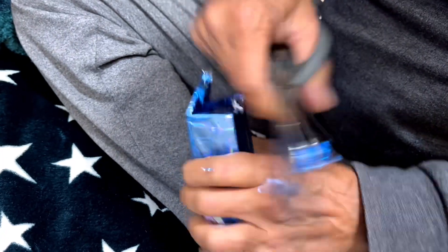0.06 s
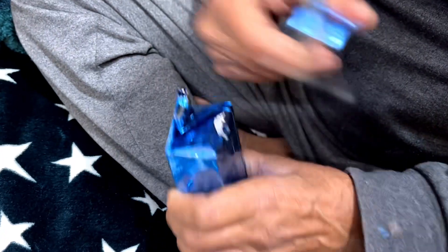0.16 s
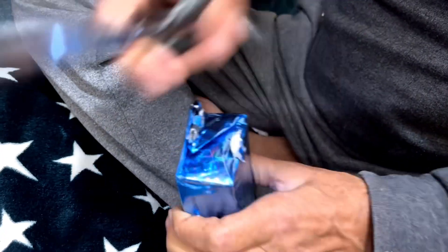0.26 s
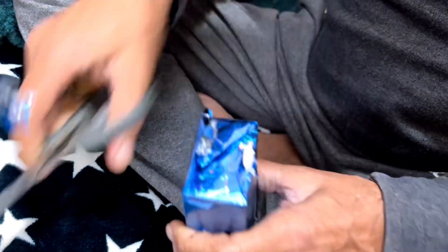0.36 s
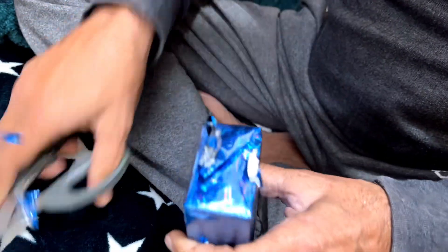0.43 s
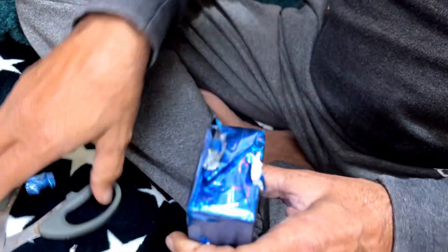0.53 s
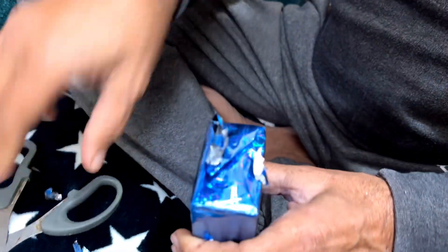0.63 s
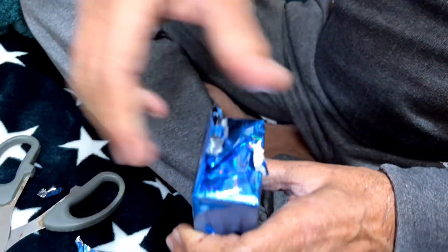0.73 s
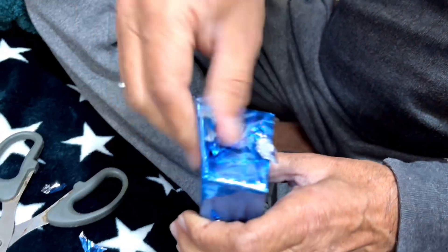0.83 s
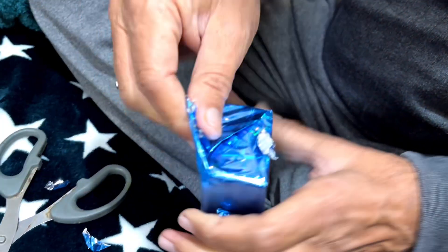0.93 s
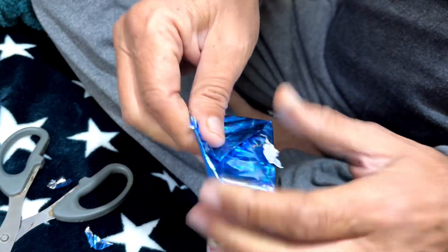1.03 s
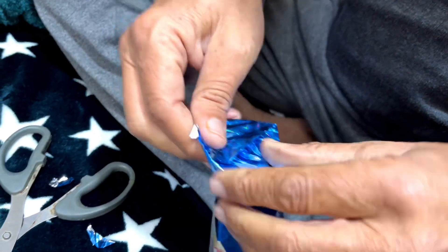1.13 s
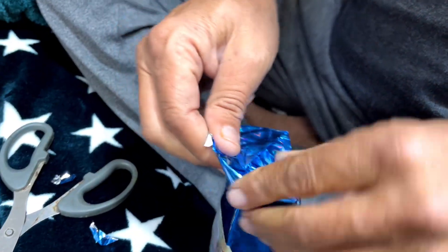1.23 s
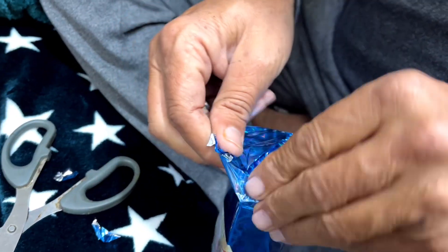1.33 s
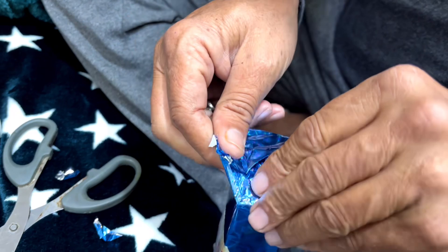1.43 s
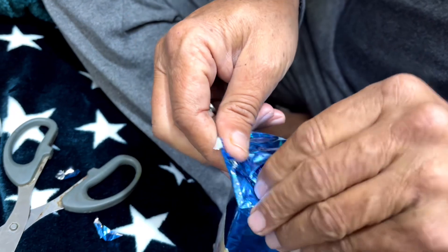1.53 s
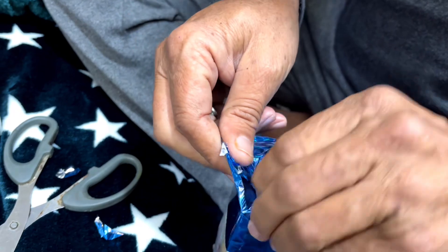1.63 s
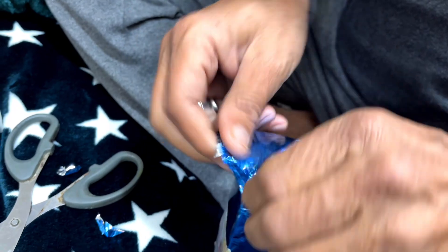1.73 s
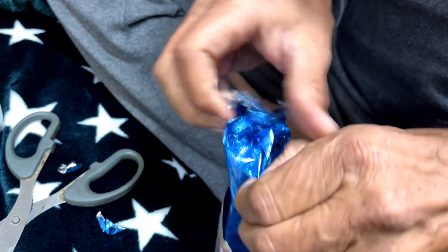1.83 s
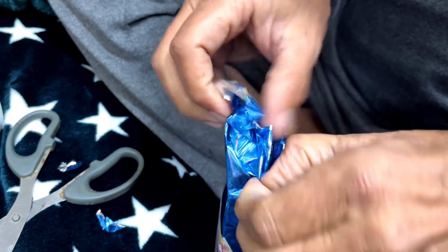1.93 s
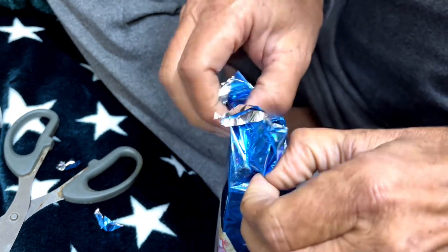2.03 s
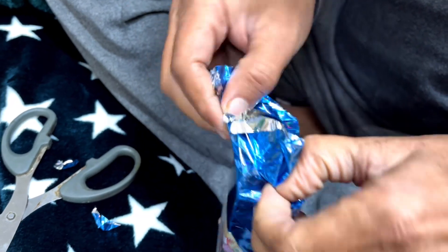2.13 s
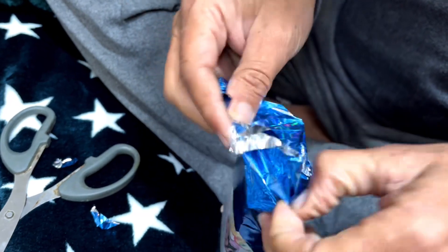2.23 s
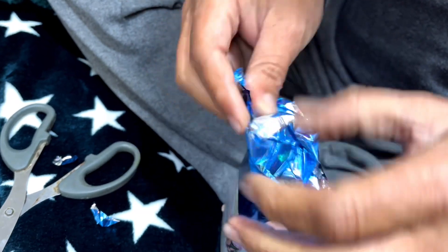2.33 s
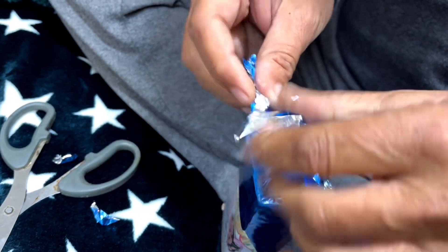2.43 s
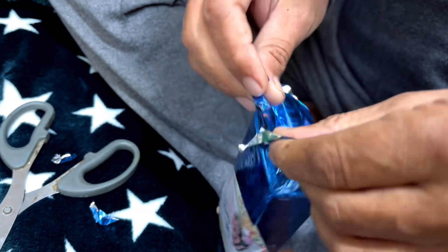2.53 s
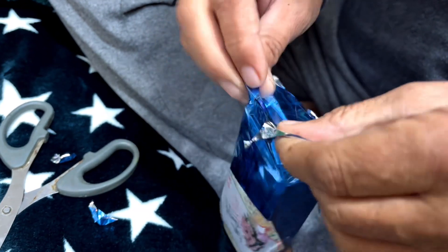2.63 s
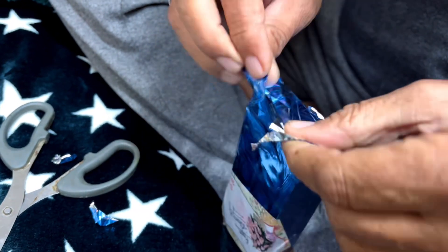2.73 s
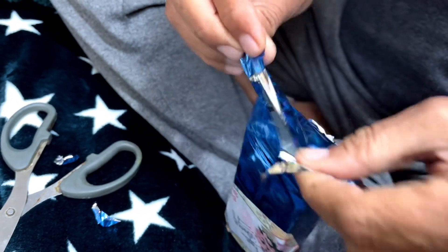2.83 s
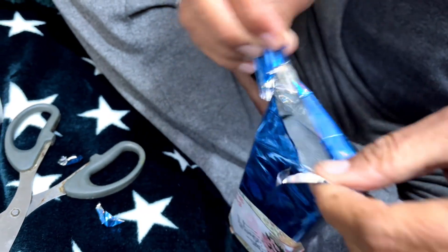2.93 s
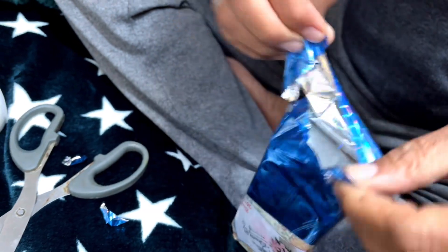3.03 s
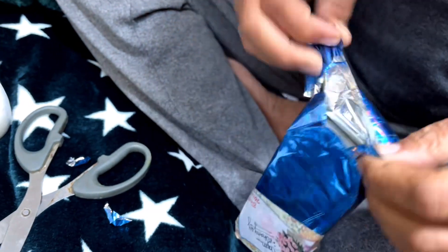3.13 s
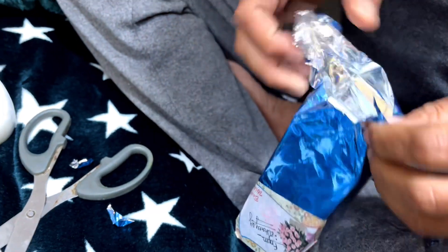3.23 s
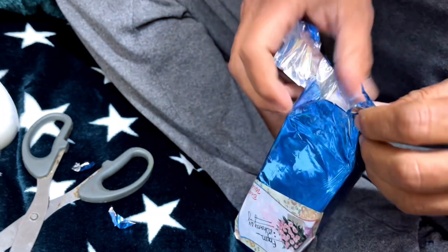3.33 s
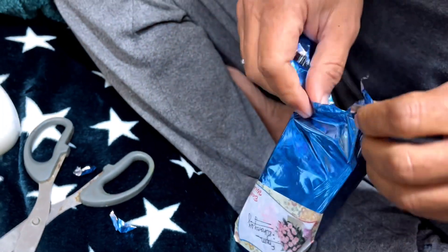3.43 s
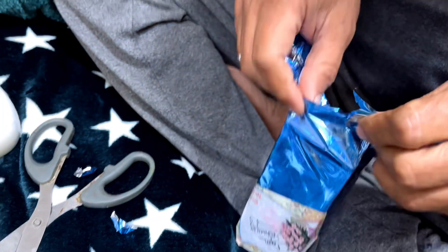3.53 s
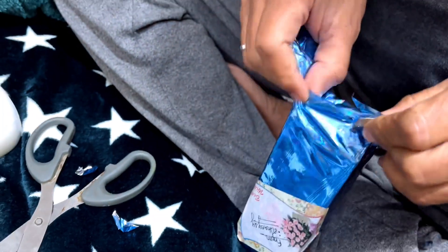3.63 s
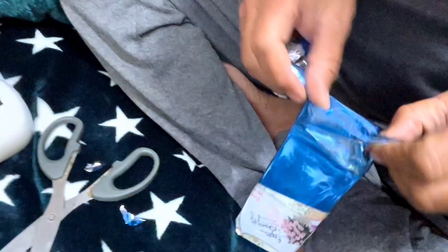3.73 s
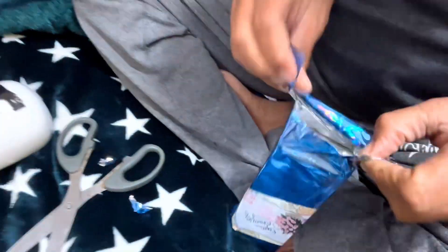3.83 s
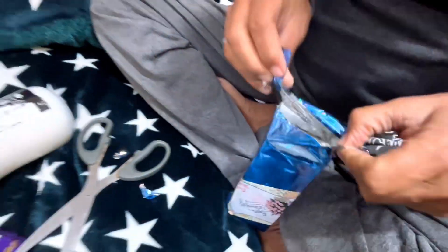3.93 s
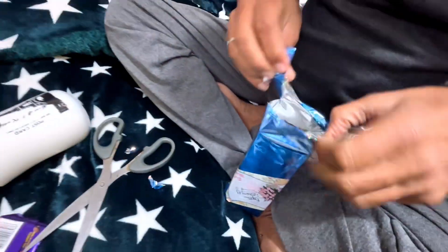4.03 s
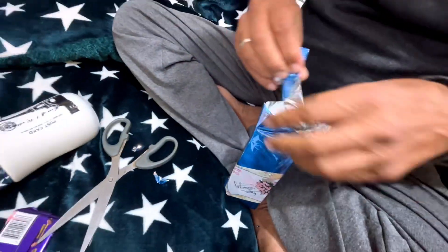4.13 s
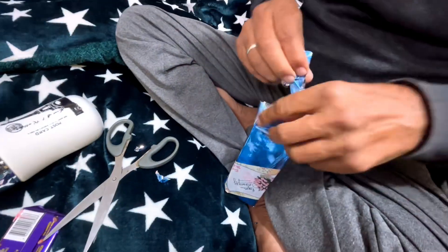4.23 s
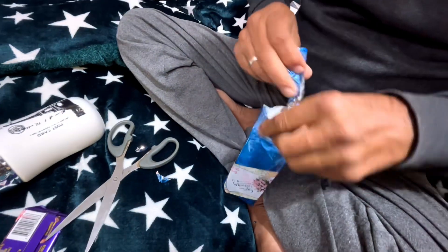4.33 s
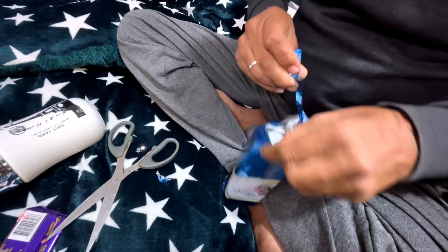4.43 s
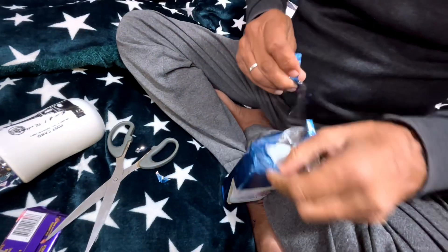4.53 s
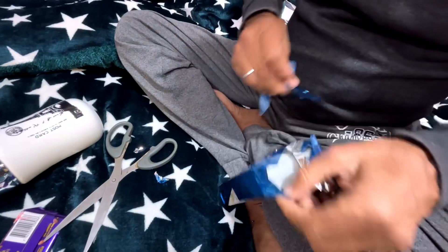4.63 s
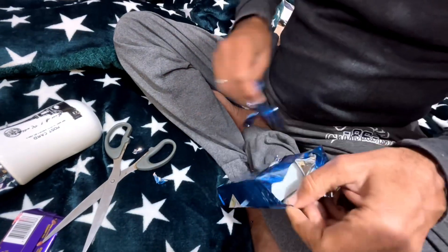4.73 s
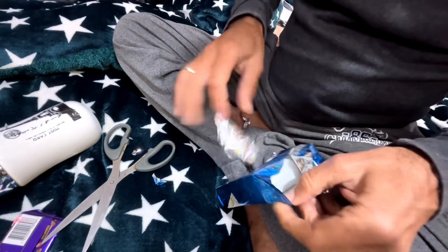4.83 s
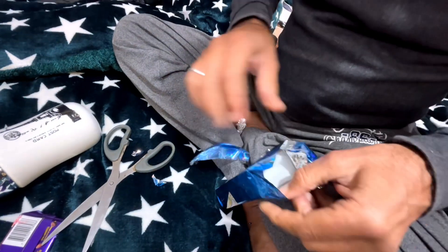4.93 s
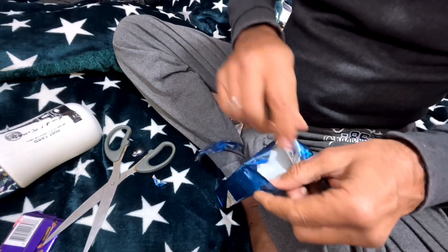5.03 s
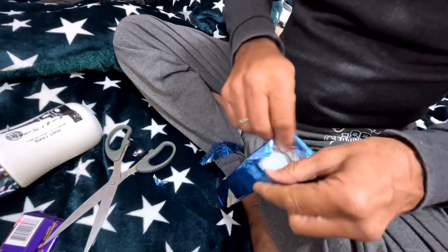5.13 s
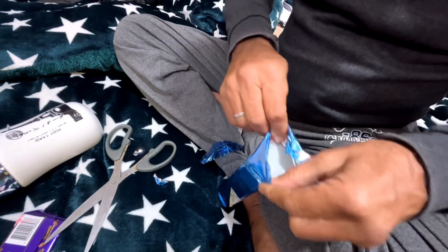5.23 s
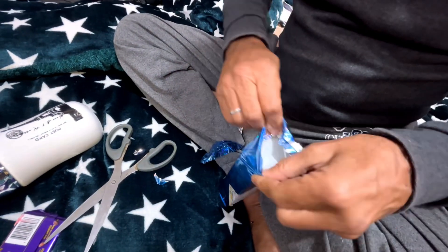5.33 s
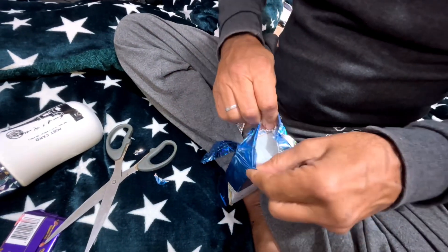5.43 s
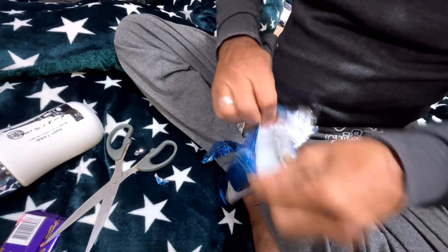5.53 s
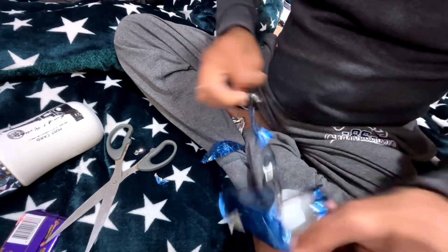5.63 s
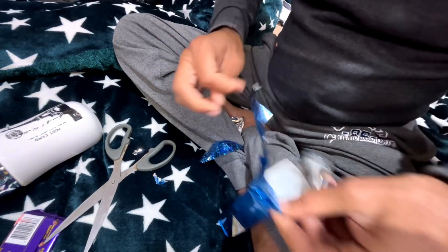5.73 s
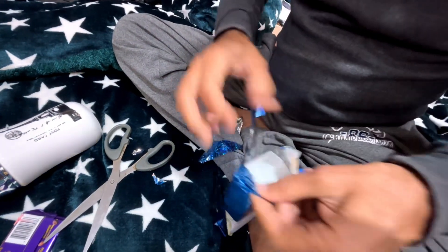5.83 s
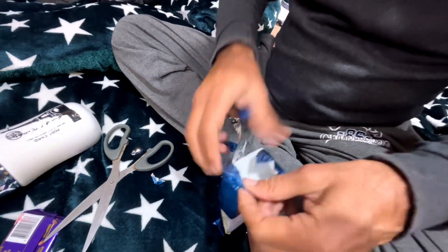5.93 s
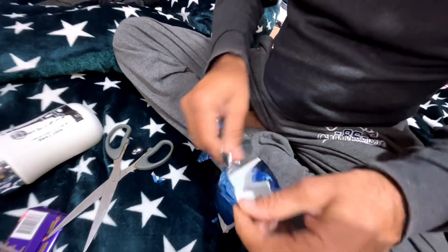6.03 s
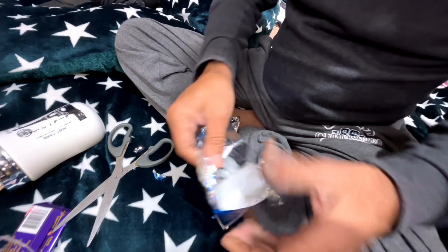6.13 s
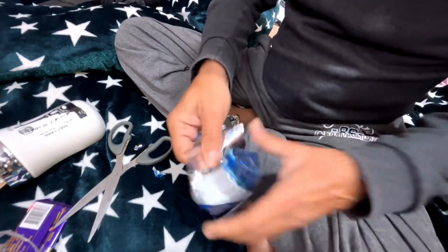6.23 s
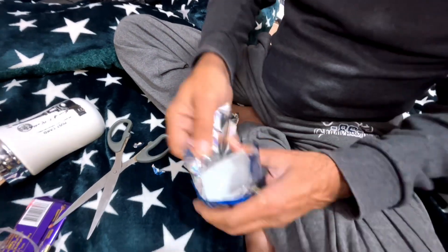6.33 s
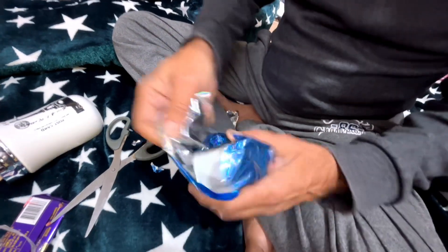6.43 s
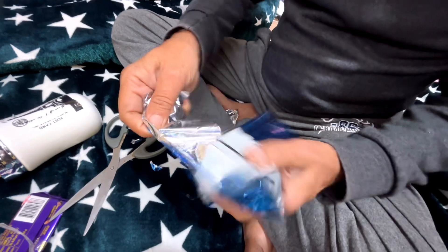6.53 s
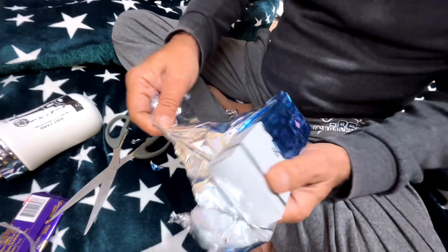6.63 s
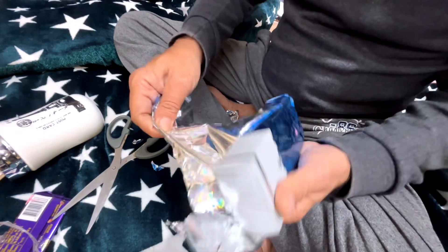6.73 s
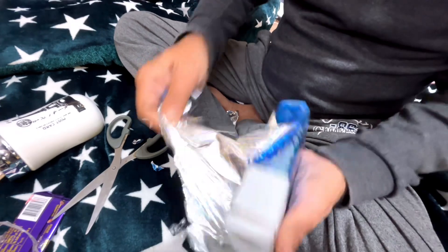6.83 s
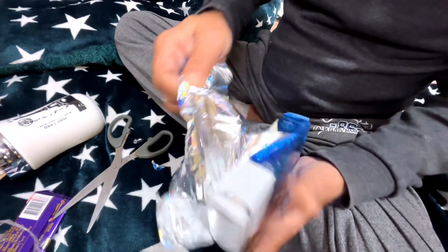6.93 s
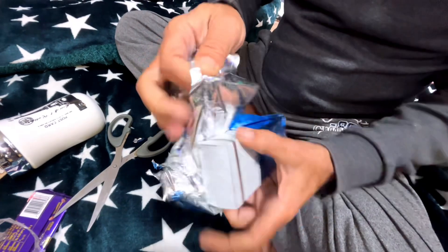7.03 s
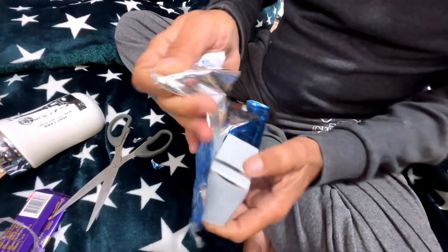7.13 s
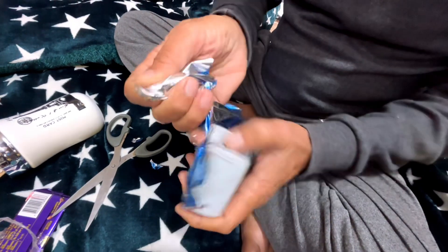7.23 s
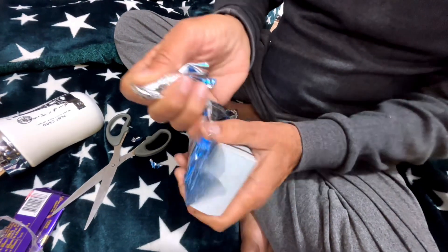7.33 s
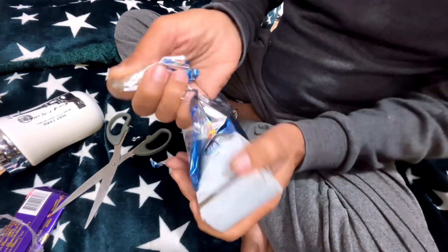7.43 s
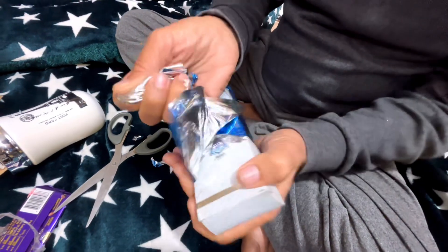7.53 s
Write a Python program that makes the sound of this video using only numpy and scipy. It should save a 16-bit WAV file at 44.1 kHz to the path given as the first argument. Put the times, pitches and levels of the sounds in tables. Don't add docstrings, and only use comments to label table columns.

```python
import sys
import numpy as np
from scipy import signal
from scipy.fft import rfft, irfft, next_fast_len
from scipy.io import wavfile
from scipy.ndimage import uniform_filter1d

SR = 44100
rng = np.random.default_rng(int(sys.argv[2]) if len(sys.argv) > 2 else 0)


def file_out(sig):
    cols = np.atleast_2d(sig).T
    lim = np.clip(cols, -1, 1)
    pcm = np.round(lim * 32767).astype(np.int16)
    wavfile.write(sys.argv[1], SR, pcm)


def to_linear_factor(level_db):
    exponent = np.asarray(level_db, float) / 20
    return 10 ** exponent


N = 333837


def evened(x):
    return x / np.sqrt(np.mean(x ** 2) + 1e-20)


def read(points, hz):
    f, value = np.transpose(points)
    return np.interp(np.log(hz + 1), np.log(f + 1), value)


def shaped(x, gain):
    size = next_fast_len(x.shape[-1])
    spectrum = rfft(x, size) * gain(np.fft.rfftfreq(size, 1 / SR))
    return irfft(spectrum, size)[..., :x.shape[-1]]


def add(mix, start_s, sound):
    part = mix[max(round(start_s * SR), 0):][:len(sound)]
    part += sound[:len(part)]


def ring(hz, t60_s, phase, rise_s=.0001):
    t = np.arange(int(t60_s * SR) + 16) / SR
    envelope = to_linear_factor(-60 * t / t60_s) * (1 - np.exp(-t / rise_s))
    return envelope * np.sin(2 * np.pi * hz * t + phase)


def clumps(grain_s):
    width = int(grain_s * SR)
    return evened(uniform_filter1d(uniform_filter1d(rng.standard_normal(N), width), width))


def steadied(x, window_s, grip):
    power = uniform_filter1d((x ** 2).mean(0), int(window_s * SR))
    return evened(x / (power + 1e-3) ** (grip / 2))


# f/Hz, density/dB per Hz
AIR = [(24, -34), (50, -13), (120, -17), (429, -28.5), (1100, -15), (6880, -46), (10400, -40), (16000, -50)]


def air():
    noise = shaped(rng.standard_normal((2, N)), lambda hz: to_linear_factor(read(AIR, hz)))
    return to_linear_factor(-77.5) * evened(noise)


# t/s, length/s, crackle level/dB
PICKING = [(0.022, .026, -26.5), (0.048, 0.037, -39), (0.234, .021, -53), (.495, 0.008, -40.5),
           (0.512, 0.011, -44), (0.828, 0.078, -40), (0.851, .04, -32.5), (1.018, 0.016, -42.5),
           (1.067, .115, -46.5), (1.112, .023, -40), (1.214, .042, -46.5), (1.283, 0.16, -45),
           (1.497, 0.16, -45.5), (1.697, 0.082, -43)]
TEARING = [(1.73, 0.075, -39), (1.8, 0.1, -34.5), (1.96, 0.057, -32), (2.021, .037, -33),
           (2.119, 0.069, -32.5), (2.217, 0.029, -37.5), (2.248, .1, -34), (2.32, 0.03, -32.5),
           (2.38, 0.046, -36), (2.464, 0.087, -34.5), (2.62, 0.032, -45.5), (2.78, .06, -35),
           (2.866, 0.067, -34.5), (2.96, 0.09, -34), (3.111, 0.024, -37.5), (3.151, 0.096, -44),
           (3.303, 0.059, -47.5), (3.358, 0.09, -37.5), (3.39, 0.055, -34.5), (3.449, .31, -42),
           (3.51, .073, -37), (3.667, .093, -41), (3.76, 0.054, -34), (3.817, .06, -45.5)]
STRETCHING = [(4.022, 0.023, -45), (4.083, .027, -43), (4.266, 0.044, -41), (4.35, 0.065, -42),
              (4.454, 0.11, -41), (4.637, .013, -39.5), (4.65, .056, -47), (4.706, 0.094, -55),
              (4.811, 0.047, -46), (5.064, .068, -52), (5.132, 0.143, -38), (5.206, 0.022, -32),
              (5.276, 0.078, -52), (5.347, 0.133, -48)]
STRIPPING = [(5.551, .016, -25), (5.576, .018, -31), (5.593, .02, -24), (5.616, 0.075, -40.5),
             (5.69, 0.1, -43.5), (5.867, .154, -47.5), (6.021, .041, -34), (6.062, 0.082, -40),
             (6.206, .03, -34), (6.258, 0.032, -34), (6.308, .03, -36), (6.224, 0.02, -30.5),
             (6.381, 0.047, -32), (6.429, .1, -35), (6.556, 0.087, -32.5), (6.716, 0.128, -35),
             (6.838, 0.142, -32.5), (7.009, 0.11, -34.5), (7.122, 0.034, -26), (7.148, 0.11, -31.5),
             (7.366, 0.1075, -31.5), (7.473, .1, -37.5)]


def pull():
    grab_s, let_go_s = 0.0055, .004
    t, out = np.arange(N) / SR, np.zeros(N)
    for s, length_s, db in PICKING + TEARING + STRETCHING + STRIPPING:
        u = t[:int((length_s + 4 * let_go_s) * SR)]
        grip = np.minimum(u / grab_s, 1) * np.exp(-np.maximum(u - length_s, 0) / let_go_s)
        add(out, s, (to_linear_factor(db) * grip) ** 2)
    return out


def shower(colour, lo_hz, hi_hz, per_s, spread_db, cycles, bunching, apart_rad, count=12):
    size = to_linear_factor(spread_db * np.minimum(rng.exponential(1, N), 3.2))
    size = size * (rng.random(N) < per_s / SR) * bunching
    which, out = rng.integers(0, count, N), np.zeros((2, N))
    slips = np.flatnonzero(size)
    for k, hz in enumerate(np.geomspace(lo_hz, hi_hz, count)):
        phase = rng.uniform(0, 2 * np.pi) + np.array([[0], [apart_rad * (-1) ** k]])
        at = slips[which[slips] == k]
        for side, crease in enumerate(ring(hz, cycles / hz, phase) * hz):
            reach = at[:, None] + np.arange(len(crease))
            out[side] += np.bincount(reach.ravel(), np.outer(size[at], crease).ravel(), N)[:N]
    power = uniform_filter1d((abs(rfft(out, next_fast_len(N))) ** 2).sum(0), size=1500)
    return evened(shaped(out, lambda hz: to_linear_factor(read(colour, hz)) / np.sqrt(power + 1e-9)))


# f/Hz, level/dB
FINE = [(1500, -19.5), (3000, -2.5), (5000, 0.5), (7500, -1.5), (10000, 4.5), (13000, 4.5), (15700, 0.66)]
# f/Hz, level/dB
FACET = [(300, -42.5), (600, -4), (1500, -2), (2500, -4.5), (4000, -9.5), (7000, -16.5), (12000, -60)]
# f/Hz, level/dB
BOX = [(150, -31), (300, -6), (500, -4), (900, -21.5)]
# t/s, crackle level/dB, big-facet share/dB
CREEP = [(0, -42, -8.5), (.1, -51.5, -2), (.32, -70, -4), (.53, -76.5, -3), (.7, -95, 8), (.97, -82, 0),
         (1.19, -55.5, -9.5), (1.7, -54, -16), (1.9, -42, -14), (3.03, -41, -8.5), (3.13, -57, -12),
         (3.3, -64.5, 1), (3.85, -49, -2.5), (4.5, -47.5, -0.5), (4.9, -74, 13.5), (5.5, -56, 7),
         (5.85, -49.5, -0.5), (7.57, -38.5, -5)]
# t/s, big-facet share in a pull/dB, hollow-box answer/dB
LOOSE = [(0, -11.5, 2), (.5, -0.5, -15.5), (.9, -11.5, -2), (1.15, -19, -14), (1.38, -16, -2.5),
         (1.55, -30, -26), (1.87, -12.5, -11), (2.15, -13, -16.5), (2.7, -5, -10.5), (3.2, -4, -2.5),
         (3.7, -5.5, -12), (4.2, -6.5, -13), (4.45, -2, -7), (4.7, -3, -13), (5.2, 0, -7),
         (5.42, 8.5, -18.5), (5.58, 5, -11), (5.8, -3.5, -12.5), (6.6, -4, -9.5), (7, -4, -6.5),
         (7.4, -7.5, -9.5)]


def wrap():
    t = np.arange(N) / SR
    loose_s, facet_db, hollow_db = np.transpose(LOOSE)
    creep_s, creep_db, creep_facet_db = np.transpose(CREEP)
    creep, pulls = to_linear_factor(np.interp(t, creep_s, creep_db)) ** 2, pull()
    level = np.sqrt(creep + pulls)
    busy = np.clip((level / to_linear_factor(-33.5)) ** .75, .06, 1.5)
    jerks = clumps(0.0039)

    fine = shower(FINE, 2420, 14700, 4000 * busy, 2.35, 2.93, to_linear_factor(2.78 * jerks) / np.sqrt(busy), 1.2)
    facets = shower(FACET, 527, 5920, 1600, 2.45, 9.4, to_linear_factor(2.3 * jerks), 1.0, count=24)
    drum = shower(BOX, 248, 780, 350, 3.8, 4.4, to_linear_factor(3.8 * jerks), 0.92, count=9)
    fine, facets, drum = (steadied(x, .035, 0.3) for x in (fine, facets, drum))

    settling = evened(shaped(rng.standard_normal(N), lambda hz: to_linear_factor(read(FINE, hz) / 2)))
    released = level < to_linear_factor(-64)
    fine = np.where(released, settling, fine)
    facets = np.where(released, settling, facets)

    big = facets + to_linear_factor(np.interp(t, loose_s, hollow_db) + 1.5) * drum
    creep_flips = creep * to_linear_factor(2 * np.interp(t, creep_s, creep_facet_db))
    pull_flips = pulls * to_linear_factor(2 * np.interp(t, loose_s, facet_db))
    flips = np.sqrt(abs(uniform_filter1d(creep_flips + pull_flips, size=200)))
    return to_linear_factor(2.5) * level * fine + to_linear_factor(-2.0) * flips * big


# t/s, peak level/dB
SNAPS = [(0.0268, -8.5), (0.0314, -9.5), (0.1082, -30), (0.1744, -30), (0.1834, -32), (0.2059, -30),
         (0.2329, -34), (0.2458, -28), (0.4204, -39), (0.4459, -41), (0.4978, -15), (0.5167, -28),
         (0.8859, -16), (0.9034, -18), (0.9268, -21), (0.9477, -27), (0.9564, -30), (0.9647, -23.5),
         (1.04, -26), (1.0485, -23), (1.07, -21), (1.0764, -28), (1.1248, -24), (1.1752, -18),
         (1.2146, -24), (1.3239, -26), (1.3578, -23.5), (1.508, -25), (1.5274, -20),
         (1.5814, -21.5), (1.6107, -22), (1.623, -23), (1.6495, -17), (1.6757, -20), (1.6924, -25),
              (1.7809, -15), (1.8257, -18), (1.9857, -17), (1.9954, -17), (2.0478, -18), (2.133, -14),
              (2.155, -18), (2.2494, -12), (2.2666, -11.5), (2.3354, -16), (2.3905, -16), (2.4037, -18),
              (2.414, -23), (2.534, -14), (2.557, -16.5), (2.6203, -14), (2.6346, -16.5), (2.7777, -14),
              (2.822, -19), (2.8639, -14), (3.1546, -19), (3.2018, -19), (3.2278, -21),
         (3.259, -22), (3.272, -23), (3.3326, -12.5), (3.38, -12.5), (3.4115, -13), (3.5753, -21),
                 (3.6686, -17), (3.6864, -21), (3.7864, -16.5), (3.9275, -21.5), (3.9423, -17),
                 (4.0347, -23), (4.131, -21.5), (4.2813, -20.5), (4.3907, -19.5), (4.4341, -14),
                 (4.4607, -21), (4.6608, -18), (4.7456, -32), (4.8336, -28), (4.951, -15), (4.9711, -23),
                 (5.007, -27), (5.0546, -28), (5.1198, -26), (5.153, -14.5), (5.1742, -16), (5.2455, -25),
                 (5.2714, -14.5), (5.2947, -20),
         (5.342, -22.5), (5.3712, -18), (5.442, -25), (5.5383, -12.5), (5.5608, -18), (5.7947, -24),
               (5.8541, -25), (5.89, -24), (5.9345, -14), (6.0843, -16), (6.1444, -14.5), (6.2128, -18),
               (6.238, -17), (6.2637, -17), (6.3824, -15.5), (6.4028, -11.5), (6.4198, -8), (6.5284, -20),
               (6.649, -19.5), (6.685, -19.5), (6.8148, -13), (6.854, -12), (6.892, -8), (6.9506, -12.5),
               (7.012, -12), (7.1383, -9), (7.1616, -18), (7.439, -11), (7.4997, -16),
         (.3184, -40), (2.3146, -20), (2.3267, -17), (2.3304, -16), (2.4236, -14), (2.4788, -17),
         (2.5462, -18), (2.6454, -21), (4.6149, -34), (4.6359, -28), (4.6401, -25), (4.9267, -36),
         (4.9397, -34), (4.994, -31), (5.0285, -29), (5.074, -30), (5.1033, -32), (5.3027, -23),
         (5.3804, -26), (5.4131, -28), (5.429, -25), (5.4765, -26), (5.5019, -25), (5.5291, -21)]


def snaps():
    out, t = np.zeros((2, N)), np.arange(200) / SR
    flip_s, rebound_s = .00025, .0015
    shape = t / flip_s * np.exp(1 - t / flip_s) + .25 * np.exp(-t / rebound_s)
    rows = SNAPS
    for (s, db), (rattle, other) in zip(rows, rng.standard_normal((len(rows), 2, 200))):
        pitch_hz = 11540 * np.exp(0.12 * other[-1])
        pair = np.array([rattle, .8 * rattle + .6 * other]) * shape

        def colour(hz):
            peak = np.exp(-(np.log((hz + 1) / pitch_hz) / 0.63) ** 2)
            return (peak + 0.2 * (hz > 500)) * (hz < 16500)

        flip = shaped(pair, colour)
        add(out.T, s + .0008, to_linear_factor(db - 0.46) * flip.T / abs(flip[0]).max())
    return out


# f/Hz, level/dB
RUMBLE = [(25, -42), (60, -10), (100, -1.5), (170, -2), (450, -24.5)]
# t/s, rumble level/dB, 20 dB fade/s
SHIFTS = [(.04, -52, 0.1), (.56, -61, .05), (1.97, -60.5, 0.2), (2.37, -49, 0.05), (2.51, -62, 0.05),
          (2.79, -61, .08), (2.93, -54, 0.22), (3.02, -49, 0), (4.18, -50, 0.2), (5.555, -35, 0.24),
          (6.04, -48.5, 0.27), (6.22, -50.5, 0.4), (6.27, -50, .27), (6.58, -45.5, 0.4), (6.84, -46.5, 0.1),
          (6.91, -48.5, 0.3), (7.05, -36.5, 0.43), (7.2, -38, 0.4), (7.4, -48.5, 1)]


def hands():
    common, left, right = rng.standard_normal((3, N))
    rumble = shaped(common + 0.59 * np.array([left, right]), lambda hz: to_linear_factor(read(RUMBLE, hz)))
    t = np.arange(0, N, 64) / SR
    swell = to_linear_factor(-80)
    rise_db_per_s = 1400
    for s, db, fade_s in SHIFTS:
        swell = swell + to_linear_factor(db + np.minimum(rise_db_per_s * (t - s), -20 * (t - s) / fade_s))
    return np.interp(np.arange(N) / SR, t, swell) * evened(rumble * to_linear_factor(2.9 * clumps(0.033)))


# t/s, peak level/dB,
# f/Hz, t60/s
KNOCKS = [(.14, -42.5, 413, .04), (.2, -48, 1400, .02), (.283, -53, 350, 0.027), (.283, -50.5, 1350, .02),
          (0.497, -40.5, 810, 0.05), (0.496, -35, 2400, 0.025), (.533, -40, 780, .03),
          (.497, -39, 4700, .03), (0.54, -42.5, 40, 0.26), (2.69, -37, 380, 0.072),
          (3.158, -32, 400, 0.029), (3.785, -35, 460, 0.066), (4.39, -36, 435, 0.063),
          (4.664, -32, 990, 0.032), (5.572, -15, 260, 0.06), (6.9, -24.5, 198, 0.035),
          (7.014, -29, 150, 0.055), (7.054, -19.5, 282, 0.033),
          (2.905, -33, 420, .03), (3.012, -31, 497, .03), (3.039, -34, 616, .03), (3.114, -34, 540, 0.043),
         (3.523, -35.5, 458, 0.035), (4.185, -34, 694, 0.034), (4.434, -37, 450, 0.036),
         (4.465, -37, 450, 0.034), (6.036, -35.5, 237, .04), (6.418, -31, 350, 0.026),
         (6.582, -31, 239, 0.042), (7.07, -30, 100, 0.089), (7.132, -30, 178, .06),
         (7.202, -27, 218, 0.038), (7.371, -34, 264, .04)]


def knocks():
    out = np.zeros(N)
    for s, db, hz, t60_s in KNOCKS:
        add(out, s, to_linear_factor(db) * ring(hz, max(t60_s, .01), 0, rise_s=0.0008))
    return out


# t/s, peak level/dB, centre f/Hz
POPS = [(0.2, -35, 4440), (0.496, -25.5, 4570), (0.836, -35, 4650), (0.861, -24, 5330),
        (0.956, -34, 4370), (1.018, -42, 5770), (1.049, -31, 4200), (1.076, -33, 3910),
        (1.093, -39, 4730), (1.106, -36, 4640), (1.116, -33, 2570), (1.176, -31, 3100),
        (1.194, -33, 5020), (1.285, -38, 5070), (1.53, -31, 4130), (1.568, -38, 4830),
        (1.734, -36, 3870), (1.748, -33, 5210), (1.773, -31, 5600), (1.807, -26.5, 3190),
        (1.844, -28, 5710), (1.884, -32, 840), (1.973, -22, 3440), (2.035, -22, 5380),
        (2.107, -29, 3020), (2.316, -27, 2520), (2.391, -25, 1770), (2.449, -32, 3750),
        (2.475, -24.5, 3140), (2.511, -26.5, 3670), (2.534, -22, 1540), (2.589, -33.5, 930),
        (2.646, -35, 4440), (2.718, -27.5, 1550), (2.738, -37, 1410), (2.756, -30, 3000),
        (2.778, -25, 3880), (2.811, -20, 4280), (2.865, -28, 1920), (2.941, -28, 2760),
        (2.962, -26, 1810), (3.01, -24.5, 1610),
        (3.093, -27, 5970), (3.114, -28.5, 4750), (3.191, -35, 5420), (3.238, -34, 5660),
               (3.272, -39, 1960), (3.3, -42, 2480), (3.325, -34, 2400), (3.356, -33, 2530),
               (3.365, -31, 2890), (3.38, -24, 2940), (3.412, -18.5, 2500), (3.51, -27, 4660),
               (3.57, -23.5, 1040), (3.612, -33, 1190), (3.669, -20.5, 4530), (3.686, -22, 4350),
               (3.73, -23, 4400), (3.769, -22, 2140), (3.928, -38, 3700), (3.961, -35, 3080),
               (3.988, -36, 1870), (4.086, -38, 2200), (4.131, -38.5, 1930), (4.158, -33, 1990),
               (4.184, -33, 700), (4.259, -36, 1990), (4.326, -32.5, 3840), (4.356, -24, 2350),
               (4.379, -34, 1850), (4.422, -28, 1890), (4.464, -26, 1260), (4.499, -36, 1150),
               (4.644, -32, 2090), (4.661, -25.5, 1010), (4.746, -32.5, 1850), (4.847, -35, 875),
               (4.927, -38, 2670), (4.971, -33.5, 1970), (5.008, -37.5, 2070), (5.077, -36.5, 1260),
               (5.104, -40, 1810), (5.132, -34, 1180), (5.154, -27, 1230), (5.202, -21.5, 1260),
               (5.271, -30, 1930), (5.305, -32, 864), (5.343, -36, 1170), (5.381, -32, 1100),
               (5.43, -30, 1000), (5.443, -29, 2050), (5.358, -33, 1300), (5.414, -22.5, 910),
               (5.477, -29, 5860),
        (5.538, -16, 4700), (5.553, -11, 1870), (5.767, -33, 1170), (5.855, -32, 1960),
             (5.936, -31.5, 1160), (6.032, -31, 3880), (6.192, -28.5, 864), (6.213, -21, 3140),
             (6.235, -21, 2970), (6.264, -25, 3800), (6.311, -26, 4040), (6.382, -23.5, 2810),
             (6.471, -21.5, 4200), (6.499, -23, 2730), (6.556, -27, 4470), (6.584, -22.5, 3730),
             (6.613, -26, 4470), (6.718, -33, 4690), (6.755, -21.5, 4400), (6.884, -20, 4710),
             (6.934, -30, 3110), (7.043, -24, 4730), (7.369, -28, 1420), (7.437, -25, 3240),
             (7.5, -22, 4510)]


def pops():
    out, t = np.zeros((2, N)), np.arange(500) / SR
    rows = POPS
    for (s, db, pitch_hz), (rattle, other) in zip(rows, rng.standard_normal((len(rows), 2, 500))):
        u = t * pitch_hz / 3.4
        pair = np.array([rattle, .85 * rattle + .5 * other]) * u * np.exp(-u * 2)

        def colour(hz):
            peak = np.exp(-(np.log((hz + 1) / pitch_hz) / 0.41) ** 2)
            return peak + .15 * (hz > pitch_hz) * (hz < 9000)

        flip = shaped(pair, colour)
        add(out.T, s + .0005, to_linear_factor(db - 0.5) * flip.T / abs(flip[0]).max())
    return out


# t/s, length/s, level/dB,
# centre f/Hz, width/ln f
SCRAPES = [
    (0.621, 0.21, -70, 1240, 0.29),
    (5.555, 0.066, -29.5, 1800, 0.82),
    (7.195, 0.11, -24.5, 960, 0.91),
]


def scrapes():
    out = np.zeros(N)
    for s, length_s, db, centre_hz, width in SCRAPES:
        noise = rng.standard_normal(8000)[:int(length_s * SR)]
        rub = shaped(noise, lambda hz: np.exp(-(np.log((hz + 1) / centre_hz) / width) ** 2))
        swell = np.sin(np.linspace(0, 1, len(rub)) ** .5 * np.pi)
        add(out, s, to_linear_factor(db) * evened(rub) * swell)
    return out


# f/Hz, t60/s
TAIL = [(200, 0.25), (3000, 0.25), (12000, 0.24)]
# f/Hz, level/dB
WET = [(100, -18.5), (700, -14.5), (4000, -15), (9000, -22.5), (15000, -32)]


def room(x):
    taps = np.zeros((6, SR // 2))
    at = np.arange(40, SR // 2 - 20, 20) + rng.integers(0, 20, (6, (SR // 2 - 41) // 20))
    np.put_along_axis(taps, at, rng.choice([-1., 1.], at.shape), 1)
    hz, t, z = signal.stft(taps, SR, nperseg=128)
    fade = to_linear_factor(-60 * t / read(TAIL, hz)[:, None])
    fade = fade * (to_linear_factor(read(WET, hz)) / np.linalg.norm(fade, axis=1))[:, None]
    tail = signal.istft(z * fade, SR, nperseg=128)[1]
    turn_hz, offset = 3.1, np.arange(6)[:, None] // 2 / 3
    turns = np.cos(2 * np.pi * (np.arange(N) / SR * turn_hz + offset))
    return signal.fftconvolve(x * turns, tail, axes=1)[:, :N].reshape(3, 2, N).sum(0)


def scene():
    foil = wrap() + snaps() + pops() + scrapes()
    box = hands() + knocks()
    return foil + box + room(foil[0] + 0.43 * box[0]) + air()


SHARED_HZ = 7500
# f/Hz, phase/rad
TURN = [(9200, 0), (12100, -3.14), (14600, -6.28)]


def ports(x, lead, tilt, bright_db):
    def gain(hz):
        bright = to_linear_factor(bright_db * read(TURN, hz) / TURN[-1][1])
        left = np.exp(1j * (read(lead, hz) + read(TURN, hz)))
        right = to_linear_factor(-read(tilt, hz) / (1 + (hz / SHARED_HZ) ** 8))
        return bright * np.array([left, right])

    return shaped(x, gain)


def cancelled(pair):
    centre_hz, reach_hz = 12200, 1100
    common = shaped(pair.mean(0), lambda hz: np.clip(4 - 4 * abs(hz - centre_hz) / reach_hz, 0, 1))
    quiet = uniform_filter1d(common ** 2, size=1500) < to_linear_factor(-143)
    null = np.maximum(quiet, clumps(.03) > .8)
    return pair - uniform_filter1d(1. * null, size=100) * common


def top_cut(x):
    return signal.sosfilt(signal.butter(12, 16990, fs=SR, output="sos"), x)


# f/Hz, phase/rad
LEADS = [
    [(400, 0), (1500, -1), (2200, 1), (3500, .3), (7000, 0)],
    [(350, 0), (700, -2.4), (1800, 0), (2200, 1), (4000, 0)],
    [(300, 0), (600, -2.6), (2000, -3.1), (3100, 0), (7000, 0)],
]
# f/Hz, level/dB
TILTS = [
    [(60, -0.5), (150, 0.5), (380, 2.5), (950, 6), (2380, -1.5), (5980, 3), (15000, -15.5)],
    [(60, 1.0), (150, 4.5), (380, 7.5), (950, 6.5), (2380, 6.5), (5980, 6.5), (15000, -32)],
    [(60, 1), (150, 2), (380, -4.5), (950, 10), (2380, 7), (5980, 11), (15000, -4)],
]
BRIGHT_DB = [3, 9, 3.5]
MOVED_S = [3.4, 4.2, 5.3, 5.602]


def record(dry):
    apart = shaped(dry[1] - dry[0], lambda hz: np.maximum(1 / (1 + (hz / SHARED_HZ) ** 8), .42))
    pair = np.array([dry[0], dry[0] + apart])
    place = np.interp(np.arange(N) / SR, MOVED_S, [0.013, 0.92, 0.88, 2])
    both = np.zeros((2, N))
    for k in range(3):
        nearness = np.clip(1 - abs(place - k), 0, 1)
        both += nearness * ports(pair, LEADS[k], TILTS[k], BRIGHT_DB[k])

    def band_limit(hz):
        over_hz = hz - 15700
        return to_linear_factor(-24 * np.clip(over_hz / 250, 0, 1) - 0.045 * np.maximum(over_hz, 0))

    return top_cut(cancelled(shaped(both, band_limit)))


dry = scene()
out = record(dry)
file_out(out)
```